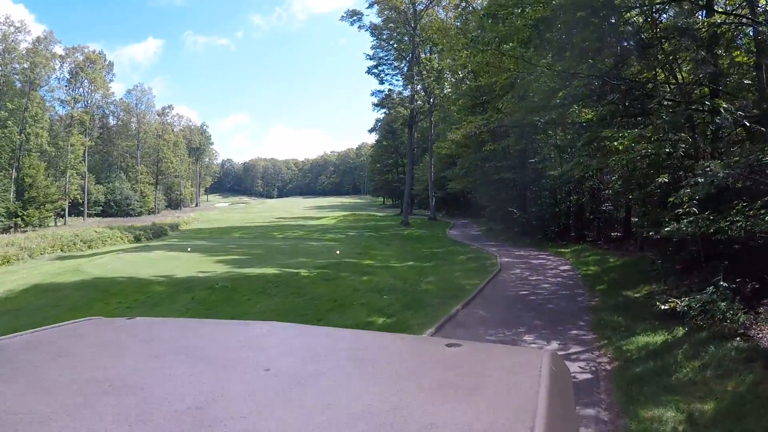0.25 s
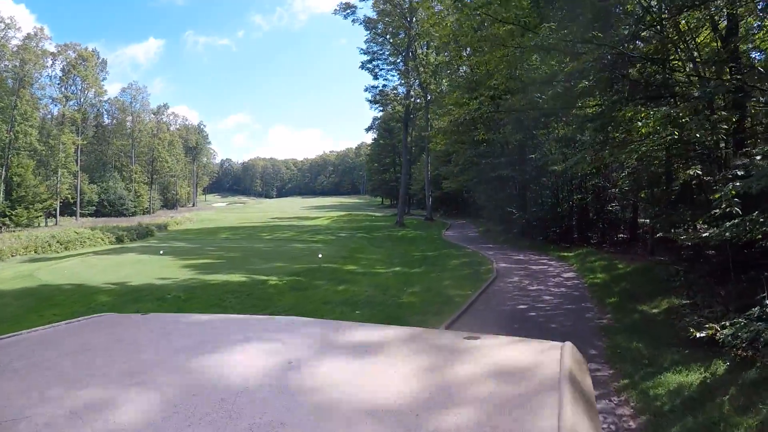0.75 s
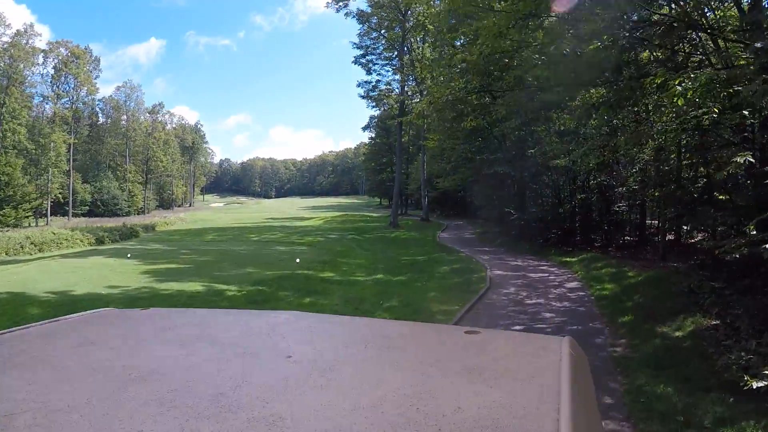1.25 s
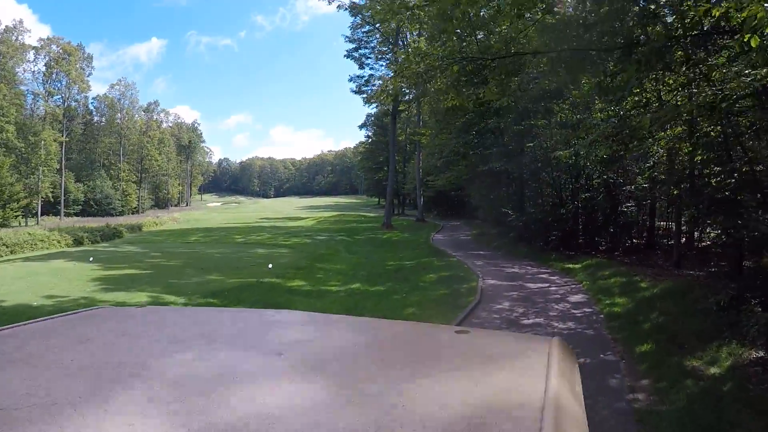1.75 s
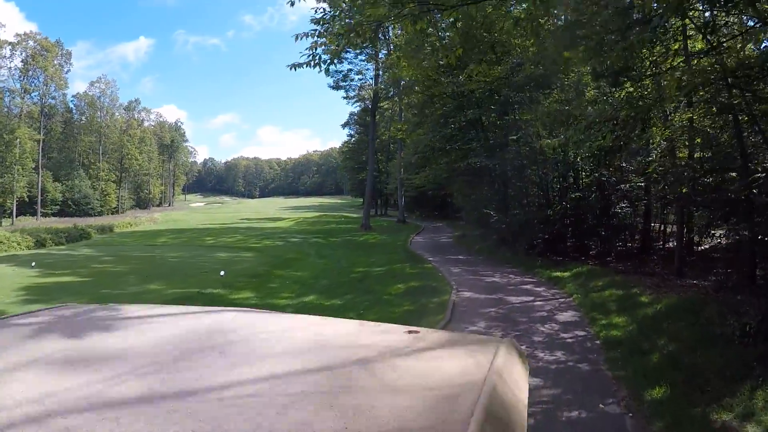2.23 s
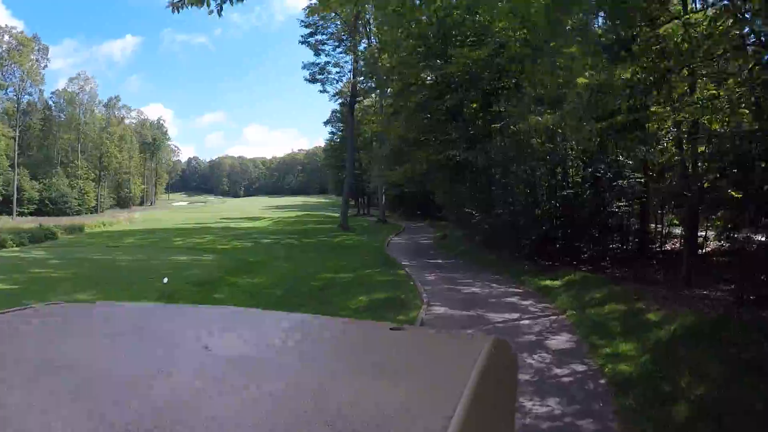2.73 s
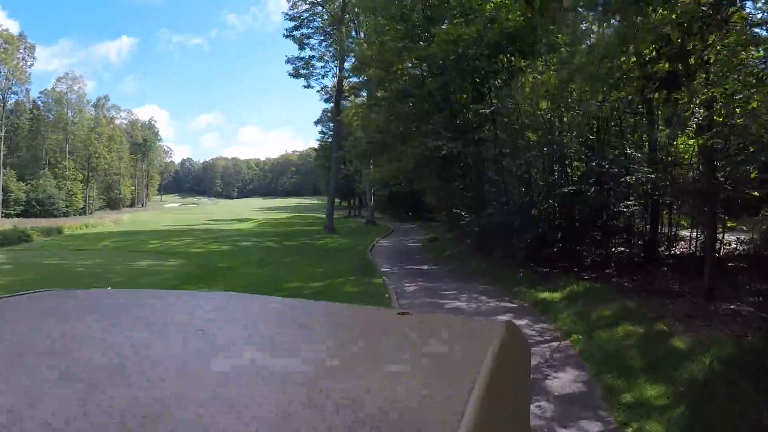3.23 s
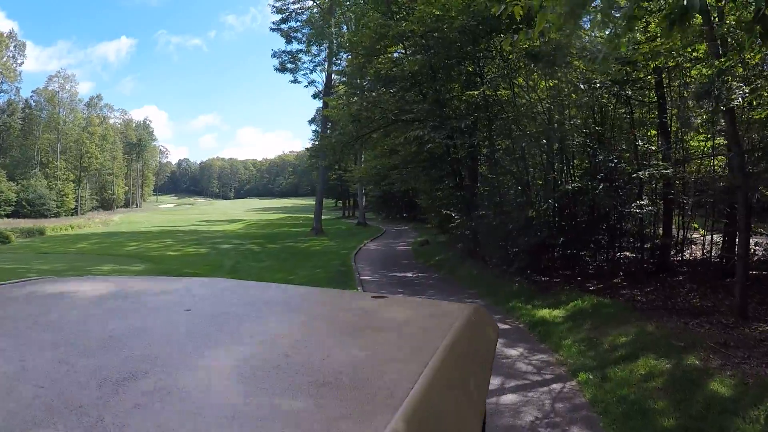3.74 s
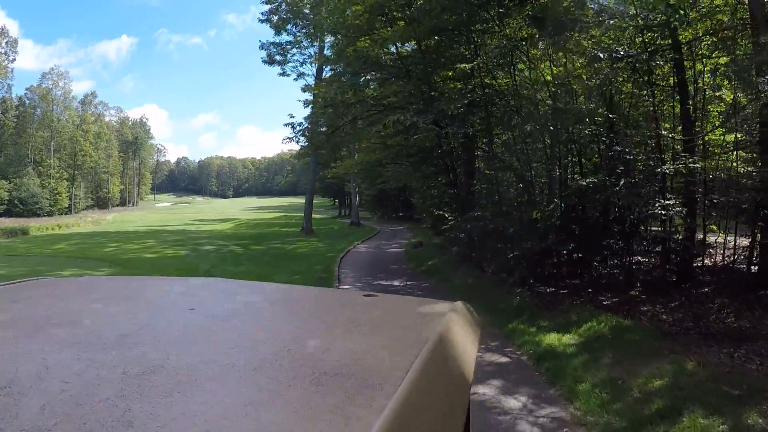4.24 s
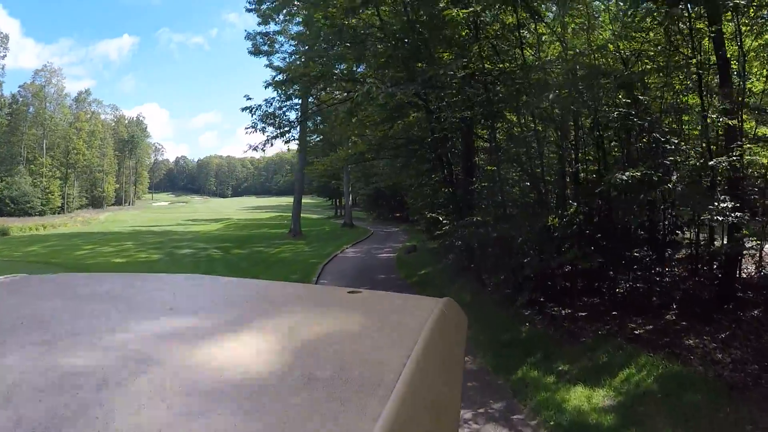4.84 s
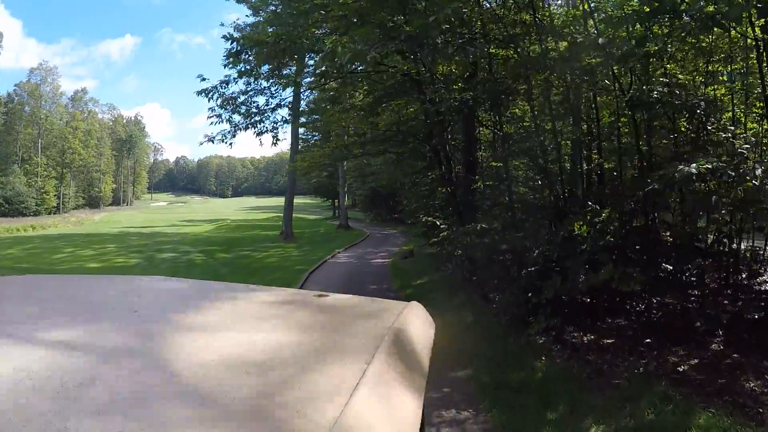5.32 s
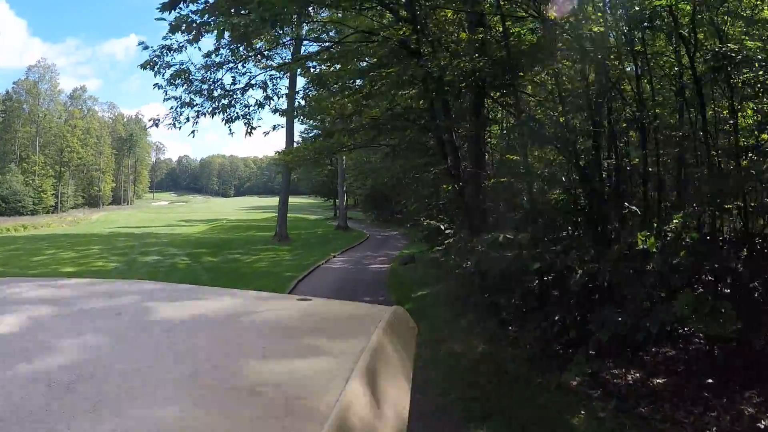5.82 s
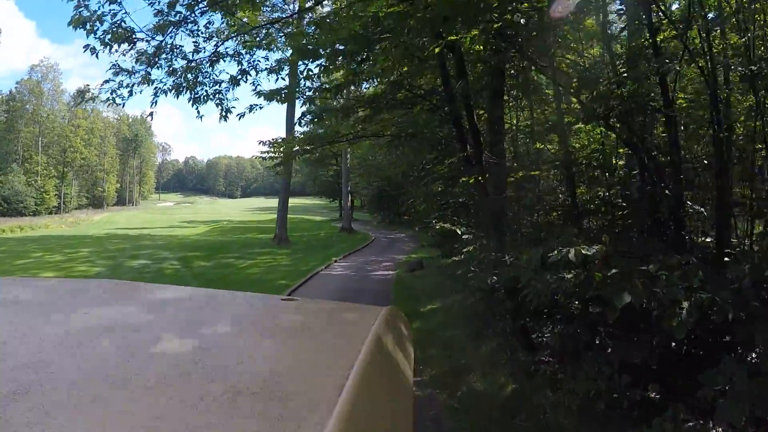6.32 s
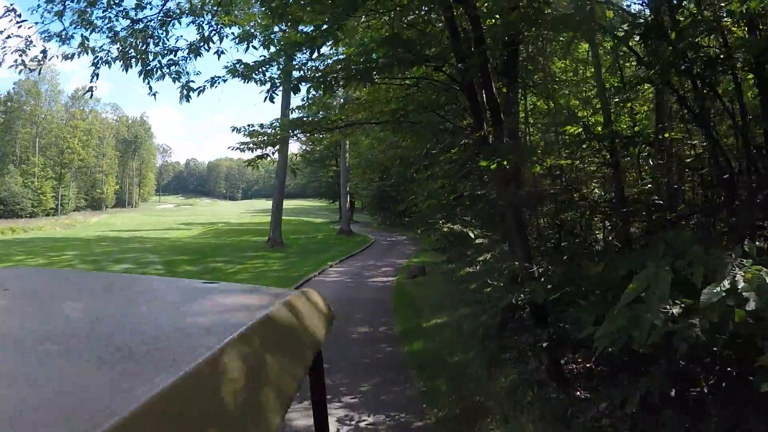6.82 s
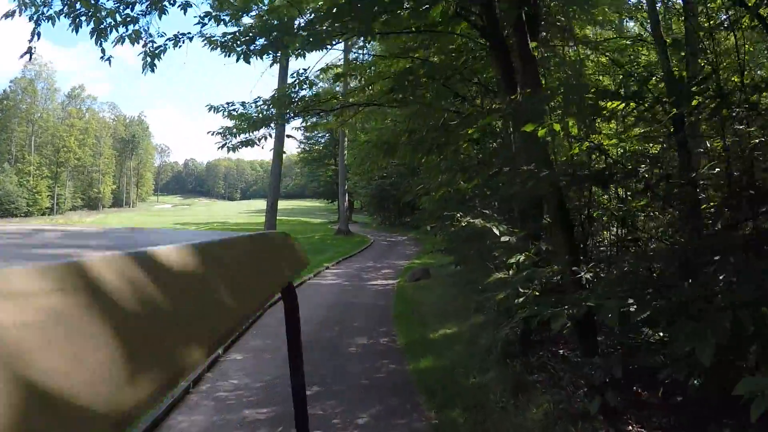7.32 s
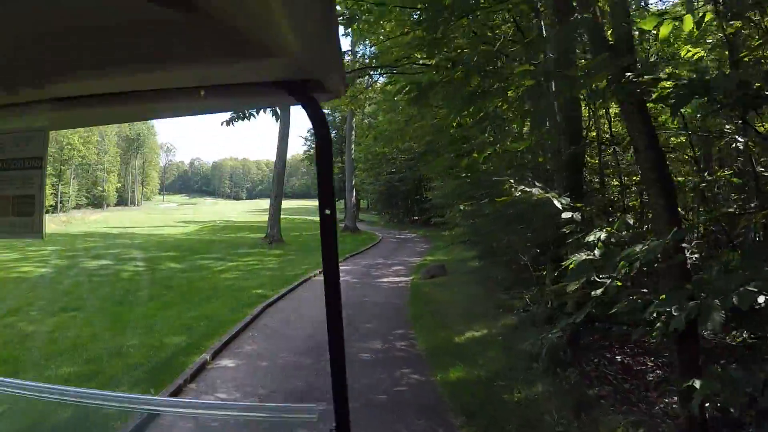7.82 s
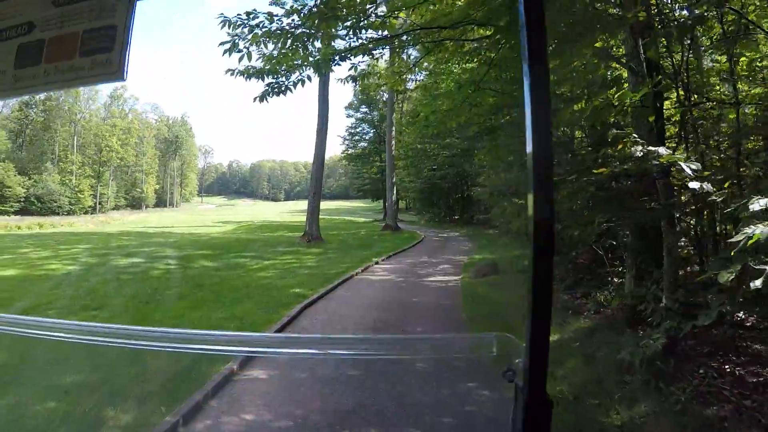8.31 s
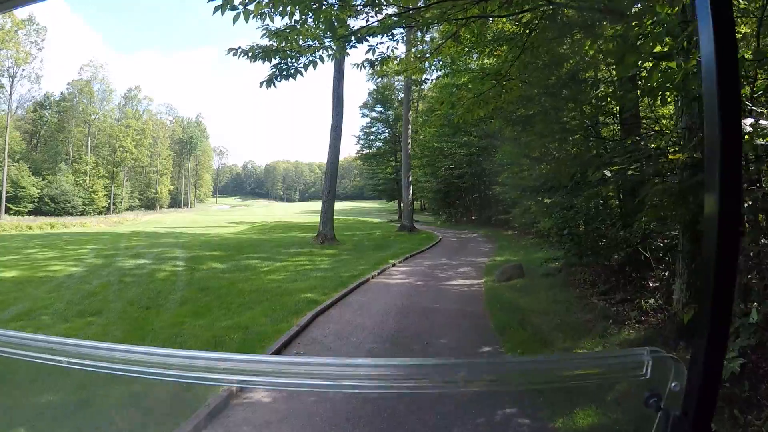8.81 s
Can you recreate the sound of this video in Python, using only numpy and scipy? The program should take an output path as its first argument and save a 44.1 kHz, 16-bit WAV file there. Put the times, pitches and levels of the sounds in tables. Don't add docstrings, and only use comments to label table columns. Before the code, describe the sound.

A small one-cylinder petrol cart chugs steadily along a paved path, tyres hissing, then the driver lifts off and the engine winds down with pole scuffs.

```python
import sys
import numpy as np
from scipy import signal
from scipy.fft import rfft, irfft, next_fast_len
from scipy.io import wavfile
from scipy.ndimage import uniform_filter1d, minimum_filter1d

SR = 44100
rng = np.random.default_rng(int(sys.argv[2]) if len(sys.argv) > 2 else 0)


def boost(x):
    u = np.asarray(x, float) / 20
    return 10 ** u


def int16_out(signal):
    q = np.round(np.clip(np.atleast_2d(signal).T, -1, 1) * 32767)
    wavfile.write(sys.argv[1], SR, q.astype(np.int16))


N = 399546
T = np.arange(N) / SR

# time in seconds, engine cycles per second in Hz.
SPEED = [(0.0, 19.226), (0.85, 20.866), (1.35, 21.399), (2.1, 21.496), (2.55, 21.175), (2.9, 20.485),
         (3.45, 19.923), (3.9, 20.368), (4.4, 21.023), (4.7, 20.983), (5.05, 20.521), (5.7, 20.155),
         (6.4, 16.74), (7.0, 14.802), (8.2, 11.183), (8.6, 9.875), (9.0, 7.511)]
# opening from 0 to 1, crank shake in dB, chassis drone in dB,
# panel tick in dB.
LOAD = [(0, -18, -35.5, -56), (.3, -18, -34, -55), (.7, -20.5, -35.5, -49.5), (1, -18.5, -32, -49.5)]
# time in seconds, level against the usual in dB.
PAVING = [(0, -0.5), (.7, 0), (1.2, -1.3), (1.85, -1), (2.1, 1.3), (2.9, -0.5), (3.55, 1.5), (3.95, 1.9),
          (4.4, 2.5), (5.0, 0.8), (5.65, 0.8), (6.0, -1.5), (6.5, -3.5), (6.9, -2.2), (7.4, -3), (9.06, -4)]


def evened(x):
    return x / np.sqrt(np.mean(x ** 2) + 1e-20)


def columns(table):
    s, *rest = np.transpose(table)
    return [np.interp(T, s, column) for column in rest]


def read(points, hz):
    f, value = np.transpose(points)
    return np.interp(np.log(hz + 1), np.log(f + 1), value)


def drift(hz):
    low_pass = signal.butter(2, np.clip(hz, .1, 999), fs=SR)
    return evened(signal.lfilter(*low_pass, rng.standard_normal(N)))


def noise(points, patchy_db, size=1024):
    frames, hz = 4 * N // size + 5, np.fft.rfftfreq(size, 1 / SR)
    real, imaginary, patches = rng.standard_normal((frames, len(hz), 3)).T
    patches = uniform_filter1d(patches, size=14, axis=0)
    patches = evened(uniform_filter1d(patches, size=12, axis=1))
    spectra = (real + 1j * imaginary) * boost(read(points, hz)[:, None] + patchy_db * patches)
    return evened(signal.istft(spectra, nperseg=size, noverlap=3 * size // 4)[1][:N])


def beats(turns, place, level_db, shape, jitter_s, uneven_db):
    at = np.flatnonzero(np.diff(np.floor(turns - place)) > 0)
    late, size = rng.standard_normal((2, len(at)))
    moments = at + np.round(late * jitter_s * SR).astype(int)
    train = np.zeros(N)
    train[np.clip(moments, 0, N - 1)] = boost(level_db[at] + uneven_db * size)
    return signal.oaconvolve(train, shape)[:N]


def ring(hz, peak_s, lead):
    t = T[:SR // 8]
    swell = t / peak_s * np.exp(1 - t / peak_s)
    return -np.sin(2 * np.pi * hz * t + lead) * swell


def over_cruise():
    return columns(SPEED)[0] - 21


def by_opening(table):
    # time in seconds, throttle opening from 0 to 1.
    pedal = [
        (0, 1),
        (1.98, .7),
        (2.56, .3),
        (3.5, 1),
        (4.56, .7),
        (5.76, 0),
    ]
    s, opening = np.transpose(pedal)
    steps = opening[np.searchsorted(s, T, "right") - 1]
    now = uniform_filter1d(steps, round(.05 * SR))
    at, *rest = np.transpose(table)
    return [np.interp(now, at, column) for column in rest]


def engine():
    # opening from 0 to 1, exhaust, intake, pumping and body boom in dB.
    breathing = [(0, -14.5, -24, -9, -30), (.3, -13, -38, -26, -21), (.7, -11, -14, -38, -17.5),
                 (1, -9, -7.5, -36, -38)]
    # multiple of the cycle, level in dB rms.
    orders = [(9, -36.5), (11, -44.5), (12, -45), (13, -42), (15, -42.5), (16, -45.5)]
    cycle_hz, above_hz = columns(SPEED)[0], over_cruise()
    turns = np.cumsum(cycle_hz) / SR
    exhaust_db, intake_db, pump_db, boom_db = by_opening(breathing)
    exhaust_db = np.maximum(exhaust_db + 2.6 * above_hz, -38)
    intake_db = intake_db + .9 * above_hz
    pump_db = pump_db + 1.2 * np.minimum(cycle_hz - 10.8, 0)
    crank_db = by_opening(LOAD)[0]

    t = T[:SR // 10] - .012
    push = np.exp(-(t / .0035) ** 2) - .4 * np.exp(-((t - .011) / .0064) ** 2)
    out = beats(turns, .285, exhaust_db, ring(107, .0064, .9), jitter_s=.0002, uneven_db=.8)
    out += beats(turns, .7, intake_db, ring(105, .0066, -.05), jitter_s=.0002, uneven_db=.8)
    pumping = beats(turns, .175, pump_db, push, jitter_s=.0003, uneven_db=1)
    out += np.roll(pumping, -round(.014 * SR))
    out += boost(crank_db) * np.cos(4 * np.pi * turns - .26)
    out += boost(boom_db) * np.cos(12 * np.pi * turns - 1.96)
    out = signal.sosfiltfilt(signal.butter(2, [30, 190], "band", fs=SR, output="sos"), out)
    out += .36 * signal.filtfilt(*signal.iirpeak(143, 5, SR), out)

    firing_db = .8 * (np.minimum(uniform_filter1d(exhaust_db, SR // 3), -9.5) + 10)
    for multiple, level_db in orders:
        phase = 2 * np.pi * (multiple * turns + rng.random()) + 0.47 * drift(3.4)
        out += np.sqrt(2) * boost(level_db + firing_db + 1.14 * drift(2.9)) * np.cos(phase)
    return out + shaken(turns)


def shaken(turns):
    # time in seconds, canopy ring in dB.
    lowering = [(0, -50.5), (5.7, -32), (6.0, -27.5), (6.8, -24.5), (7.4, -34), (8.0, -18), (8.5, -17),
                (8.75, -21), (9.06, -18.5)]
    # time in seconds, level in dB.
    bumps = [
        (.1, -55.5),
        (2.33, -51),
        (3.0, -56.5),
        (3.57, -47.5),
        (4.62, -53),
        (5.62, -54.5),
    ]
    rattle_db = -57 + 3.5 * columns(PAVING)[0]
    tick_db = by_opening(LOAD)[2] - 2.2 * np.maximum(over_cruise(), -1)
    strikes = beats(turns, .78, tick_db, np.exp(-T[:2000] / .009), jitter_s=.001, uneven_db=2.5)
    panel = noise([(1900, -30), (2300, -14), (2500, 0), (2580, -3), (2750, -22), (3300, -40)],
                  patchy_db=.5, size=512)
    buzz = noise([(1150, -34), (1350, -19), (1550, -12), (1900, 4), (2500, 2), (3300, -47.5)],
                 patchy_db=4.5, size=512)
    canopy = beats(turns, .325, columns(lowering)[0], ring(119, .014, 0), jitter_s=.001, uneven_db=1.5)
    jolts = sum(boost(db) * np.exp(-((T - s) / .1) ** 2) for s, db in bumps)
    singing = boost(rattle_db - 4 + 2.1 * drift(2.8))
    return (strikes + jolts + singing) * panel + boost(rattle_db - 6) * buzz + canopy


def gears():
    # time in seconds, pitch in Hz, level in dB rms.
    whines = [
        [(.1, 377, -46), (.8, 378.8, -47.5), (2.0, 382.3, -39), (2.45, 385, -42.5), (2.8, 374.6, -50),
         (3.2, 369.2, -41), (4.3, 354.4, -46), (4.9, 347.7, -42), (5.3, 331.3, -60)],
        [(6.35, 699, -67), (6.7, 680, -63), (7.15, 602, -58)],
        [(7.35, 753, -56.5), (7.8, 663, -62.5), (8.2, 620, -59)],
        [(7.6, 550, -53), (8.1, 500, -66)],
        [(2.05, 3260, -60), (2.17, 3270, -56), (2.27, 3340, -58)],
        [(0, 1210, -60), (.36, 1215, -56)],
    ]
    out = np.zeros(N)
    for rows in whines:
        hz, level_db = columns(rows)
        fade = np.clip(np.minimum(T - rows[0][0], rows[-1][0] - T) / 0.022, 0, 1)
        level = np.sqrt(2) * boost(level_db + 1.2 * drift(4.7))
        out += fade * level * np.cos(2 * np.pi * np.cumsum(hz) / SR + 0.22 * drift(3.2))
    return out


def gusts():
    # time of the peak in seconds, level in dB, half length in seconds.
    swelling = [
        (.4, -22, .25),
        (.9, -24, .5),
        (2.95, -23, .22),
        (3.9, -25, .45),
        (6.3, -18, .11),
        (6.56, -17, .1),
        (8.2, -28, .2),
    ]
    swells = sum(boost(2 * db) * np.exp(-((T - s) / half_s) ** 2) for s, db, half_s in swelling)
    breeze_db = -28.5 + .7 * over_cruise()
    return np.sqrt(boost(2 * breeze_db) + swells)


def road():
    # frequency in Hz, level in dB per Hz.
    wind_colour = [(8, -8), (21, -0.5), (45, 1), (75, -2), (110, -4.5), (170, -41.5), (300, -73.5)]
    drone_colour = [(70, -12), (120, 1), (170, 1.5), (230, -4), (330, -9.5), (400, -12.5), (460, -22),
                    (520, -20.5), (600, -64)]
    hiss_colour = [(350, -52), (600, -2.5), (669, -3.5), (745, 0.5), (1120, -7), (1490, -0.5), (2050, -5),
                   (2480, -4), (3580, -10), (4100, -7), (5520, -8), (6230, -6.5), (10100, -21.5),
                   (15200, -50)]
    self_colour = [(3000, -19.5), (9000, 0.5), (12000, -8), (14000, -15), (15300, -37)]
    # time in seconds, level in dB.
    rustle = [(0, -92), (8.47, -95), (8.52, -56), (8.7, -58), (8.85, -65), (8.95, -94)]
    drone_db = by_opening(LOAD)[1] + .55 * np.minimum(over_cruise() + 2, 0)
    hiss_db = -47 + columns(PAVING)[0]
    wind = gusts() * boost(1.3 * drift(7)) * noise(wind_colour, patchy_db=.5, size=4096)
    drone = boost(drone_db + 3.5 + 0.64 * drift(22)) * noise(drone_colour, patchy_db=1.45, size=4096)
    grit_db = 0.21 * drift(13) + 0.76 * drift(150)
    hiss = boost(hiss_db + 3.5 + grit_db) * noise(hiss_colour, patchy_db=0.65)
    leaf_colour = [(3000, -32), (4500, -5.5), (6500, -16.5), (9500, 1.5), (11500, -15)]  # Hz, dB per Hz
    leaves = boost(columns(rustle)[0]) * noise(leaf_colour, patchy_db=1, size=256)
    return wind + drone + hiss + leaves + boost(-65) * noise(self_colour, patchy_db=2)


def scuffs():
    # time of the peak in seconds, level in dB, rise in seconds, tail in dB, lowest frequency in Hz.
    strokes = [
        (7.599, -36, 0.012, -1, 1100),
        (8.327, -39, 0.0098, -24, 1000),
        (8.461, -22, 0.015, -5.5, 445),
        (9.03, -22, 0.019, -24, 2380),
    ]
    # frequency in Hz, level in dB per Hz.
    scrape_colour = [(350, -33), (600, 10), (651, -0.5), (1020, -3), (1130, -10.5), (2050, -4.5),
                     (3780, -8.5), (4440, -1.5), (8740, -14), (12500, -31.5), (15200, -37)]
    # frequency in Hz, width in Hz, level in dB.
    pole = [
        [(2140, 62, -10), (2590, 120, -10), (3870, 42, -4), (4050, 22, 0), (5020, 130, -9), (5580, 32, -7),
         (8050, 46, -15)],
        [(4830, 44, -1), (5650, 61, -2), (6600, 56, 0)],
        [(1010, 43, 0), (2020, 30, -2), (2630, 120, -6), (4350, 36, -4), (5450, 19, -7), (6540, 34, -6),
         (7410, 38, -6), (8470, 29, -8), (8730, 25, -11)],
        [(3750, 38, -2), (4050, 49, 0), (4740, 33, -3), (5800, 90, -2), (6890, 120, -5), (7560, 34, -9),
         (8300, 80, -10)],
    ]
    # frequency in Hz, level in dB.
    hollow = [(225, -2), (255, -1), (325, 2.5), (420, -12.5), (495, -10)]
    rasp = noise(scrape_colour, patchy_db=1.2, size=256)
    flutter_db = 1.2 * drift(150)
    out, t = np.zeros(N + SR), T[:SR // 2] - .1
    for (s, level_db, rise_s, tail_db, low_hz), modes in zip(strokes, pole):
        start = round(s * SR)
        piece = slice(start // 2, start // 2 + len(t))
        stroke = np.exp(-(t / np.where(t < 0, rise_s, .016)) ** 2)
        stroke += boost(tail_db - 60 * abs(t) / 0.24) * (t > 0)

        band = signal.butter(2, [low_hz, 14000], "band", fs=SR)
        bright = evened(signal.lfilter(*band, rasp[piece]))
        white = signal.lfilter(*signal.butter(4, 9500, fs=SR), rng.standard_normal(len(t)))
        rings = np.zeros(len(t))
        for hz, width_hz, db in modes:
            mode = signal.iirpeak(hz, hz / (60 + width_hz), SR)
            rings += boost(db) * evened(signal.lfilter(*mode, white))
        scrape = boost(level_db + flutter_db[piece]) * (bright + .6 * evened(rings))

        crack_db = level_db + 2 - 500 * rise_s
        crack = boost(crack_db) * np.exp(-abs(t + .0025) / .0016)
        crack *= uniform_filter1d(rng.standard_normal(len(t)), size=2)

        thud_db = level_db + 2 - 3.5 * np.log2(low_hz / 450) - 700 * (rise_s - .009)
        thud = sum(boost(db) * np.sin(2 * np.pi * hz * t) for hz, db in hollow)
        thud *= np.exp(-((t - .008) / 0.018) ** 2)
        out[start - SR // 10:][:len(t)] += stroke * scrape + crack + boost(thud_db) * thud
    return out[:N]


def scene():
    return (engine() + gears() + road() + scuffs())[None]


def top_cut(x):
    return signal.sosfilt(signal.butter(12, 15360, fs=SR, output="sos"), x)


def record(dry):
    # frequency in Hz, width in Hz, level in dB.
    notches = [(552, 39, -11), (1104, 70, -6)]
    over = np.maximum(-minimum_filter1d(-abs(dry), 900) / .545, 1)
    held = dry / uniform_filter1d(over, 900)
    size = next_fast_len(N + SR)
    hz = np.fft.rfftfreq(size, 1 / SR)
    dips_db = sum(db * np.exp(-((hz - notch_hz) / width_hz) ** 2) for notch_hz, width_hz, db in notches)
    edge_db = -40 * (hz > 15250)
    mix = irfft(rfft(held, size) * boost(dips_db + edge_db), size)[:, :N]
    return top_cut(mix)


dry = scene()
out = record(dry)
int16_out(out)
```